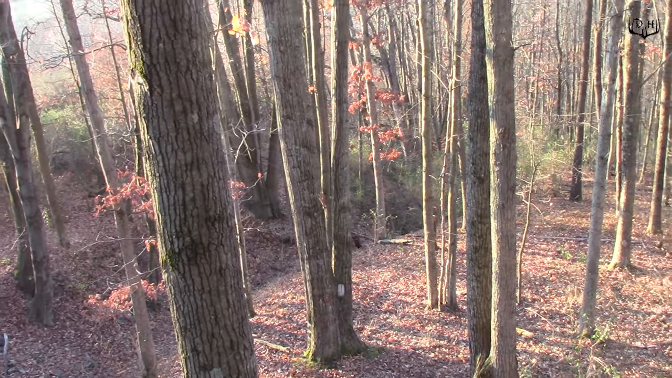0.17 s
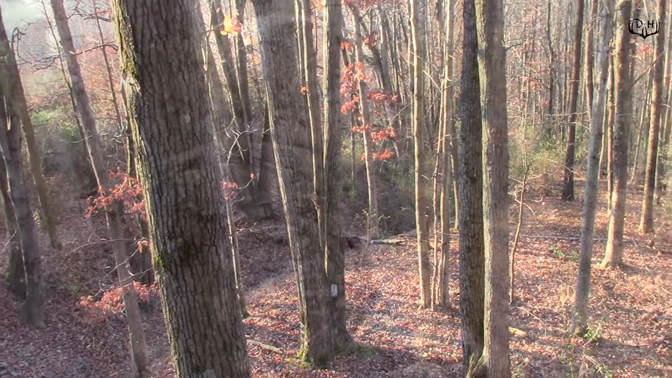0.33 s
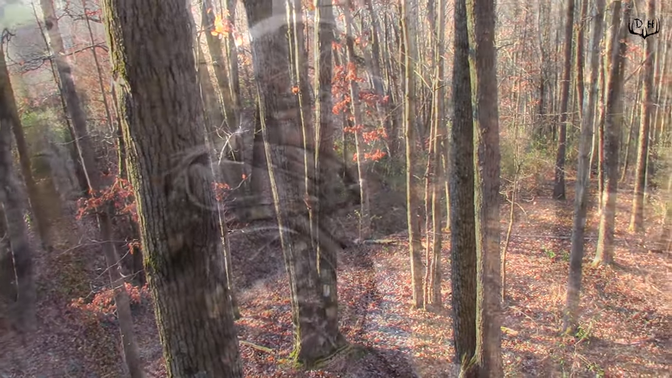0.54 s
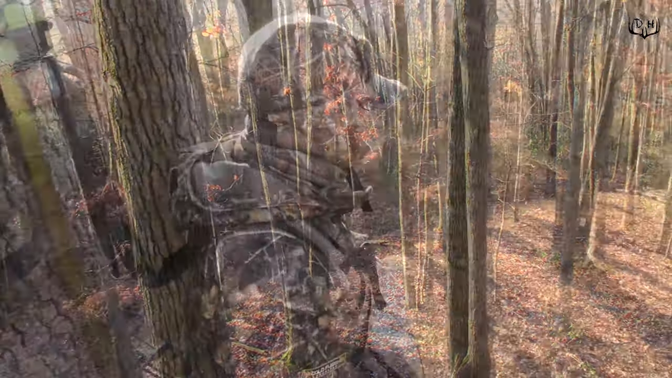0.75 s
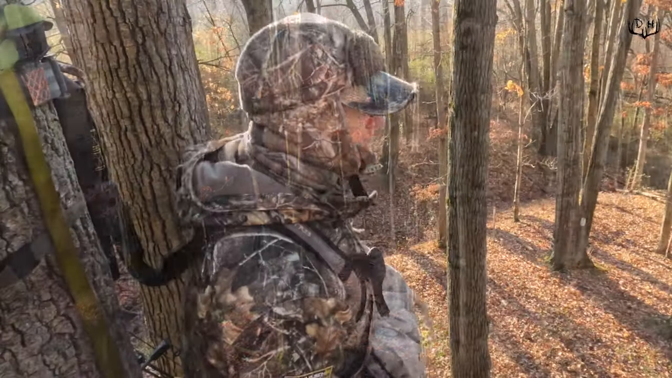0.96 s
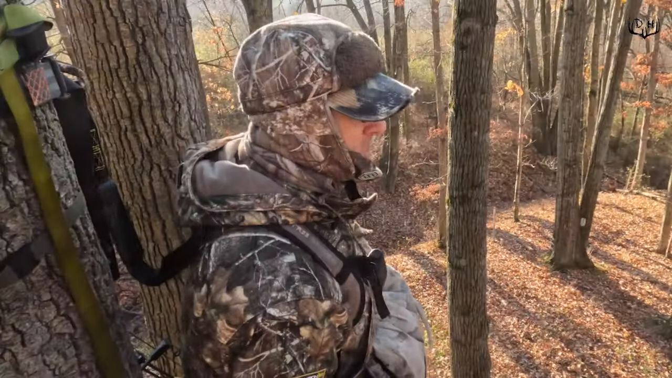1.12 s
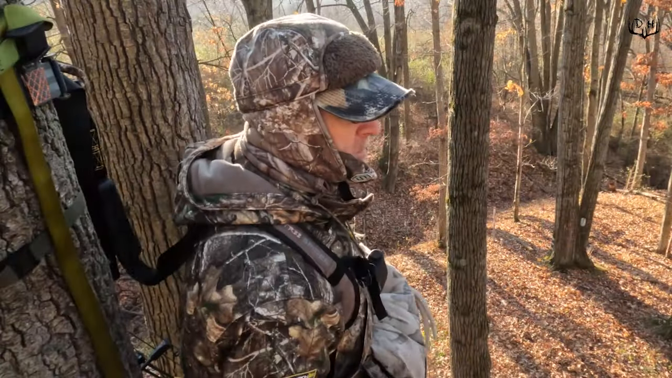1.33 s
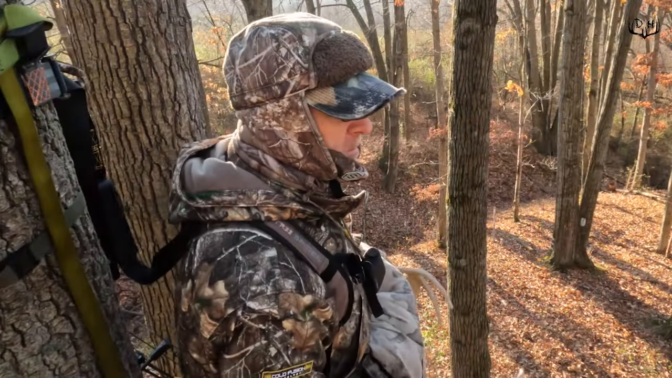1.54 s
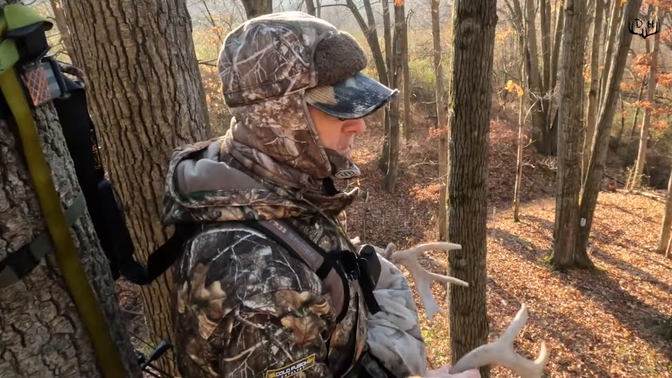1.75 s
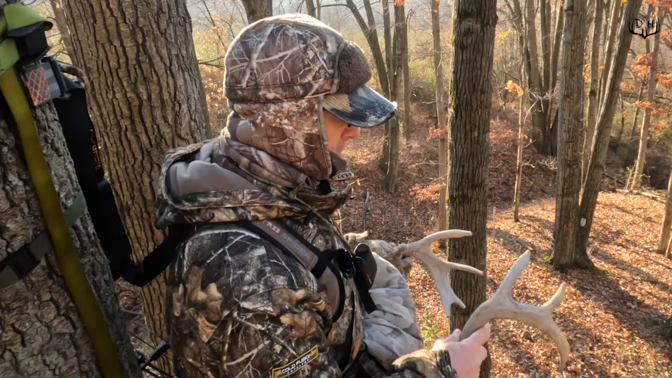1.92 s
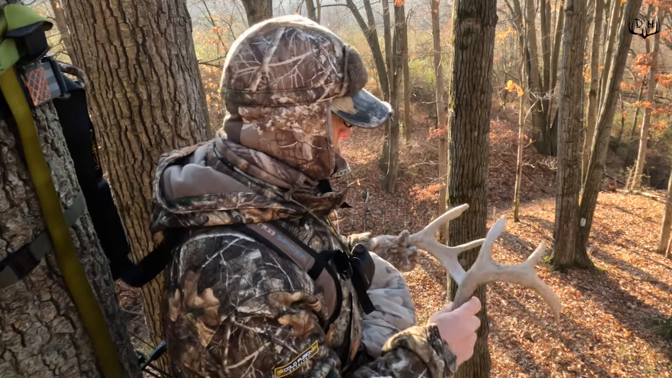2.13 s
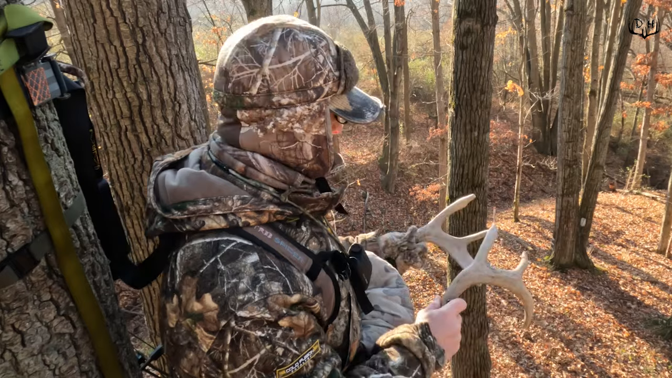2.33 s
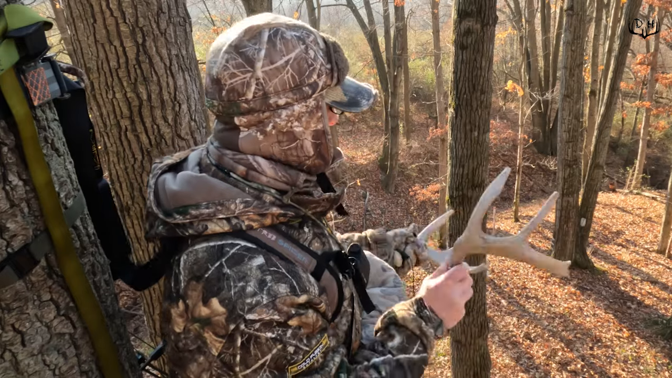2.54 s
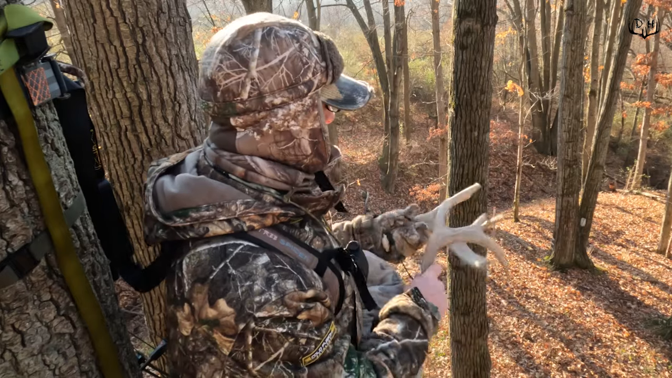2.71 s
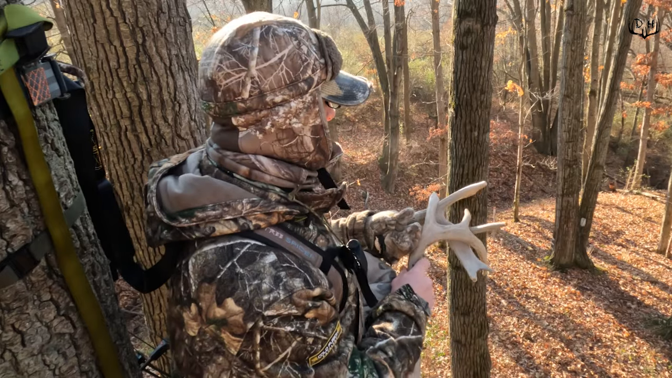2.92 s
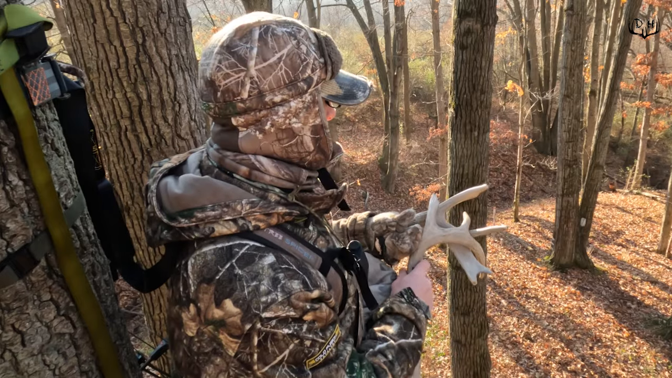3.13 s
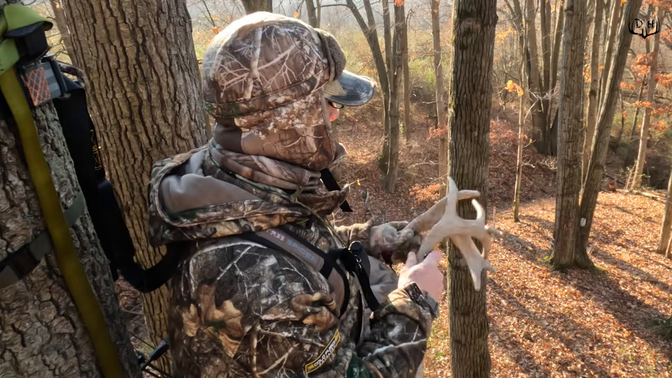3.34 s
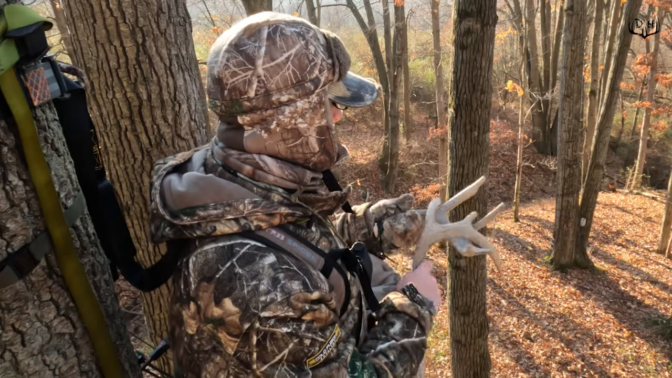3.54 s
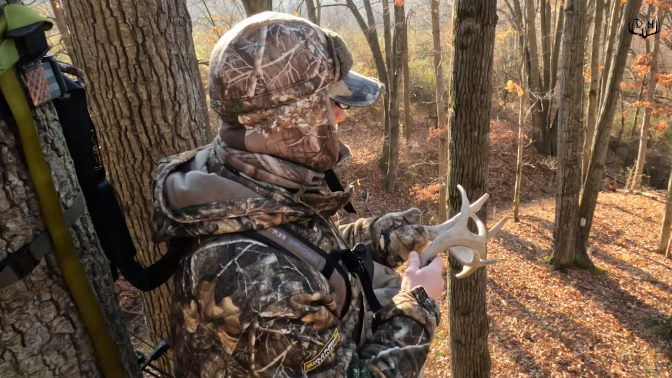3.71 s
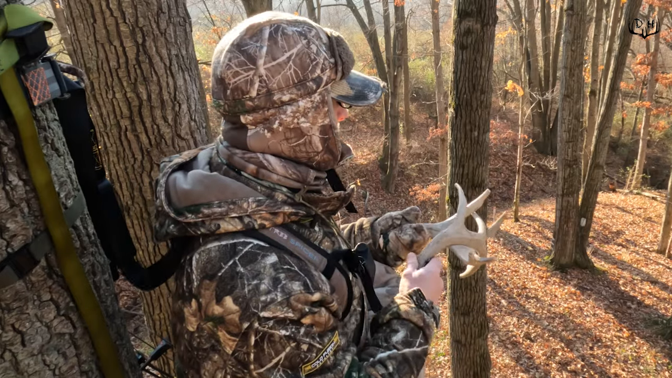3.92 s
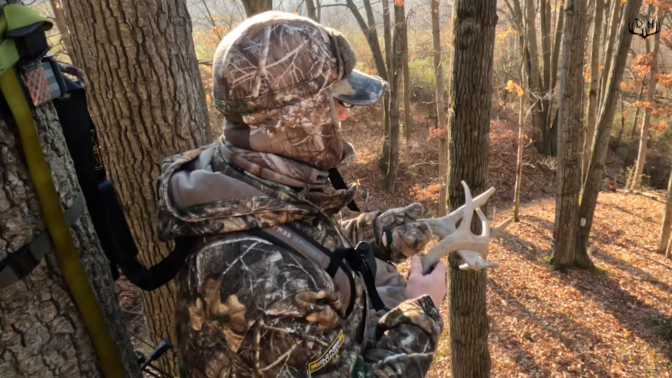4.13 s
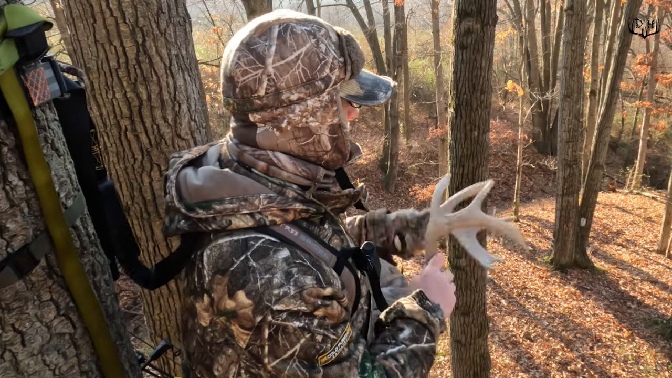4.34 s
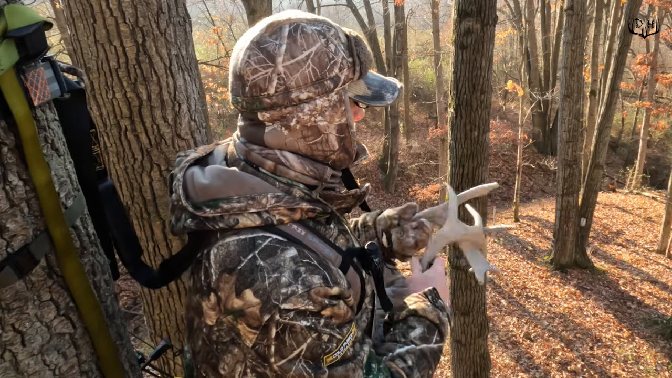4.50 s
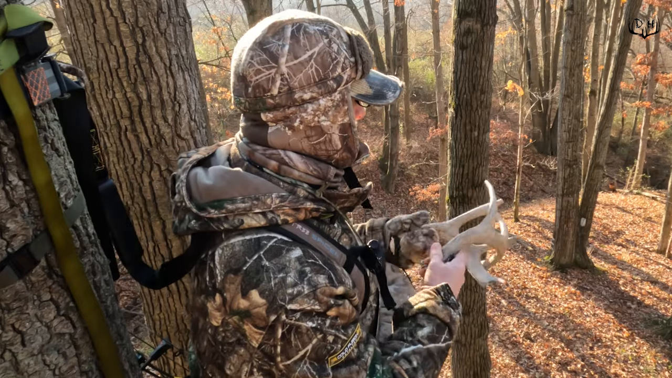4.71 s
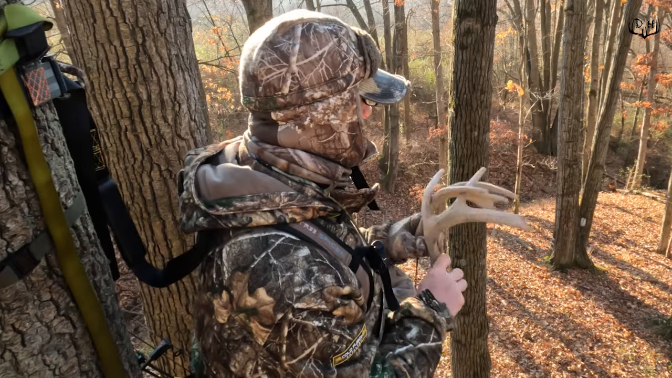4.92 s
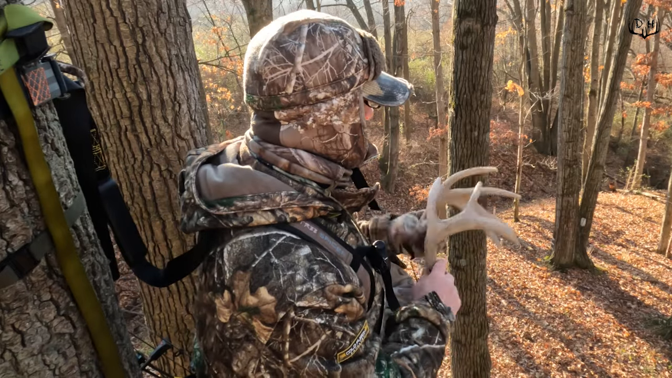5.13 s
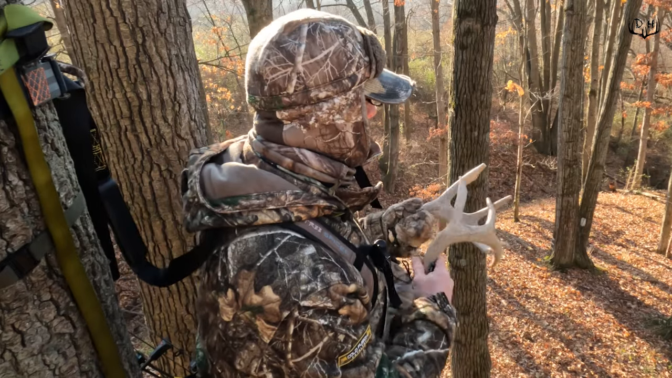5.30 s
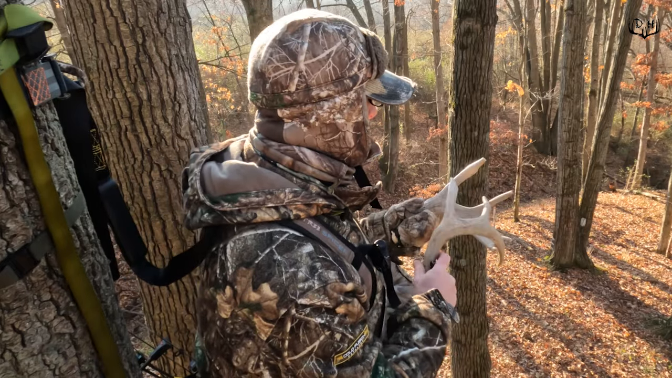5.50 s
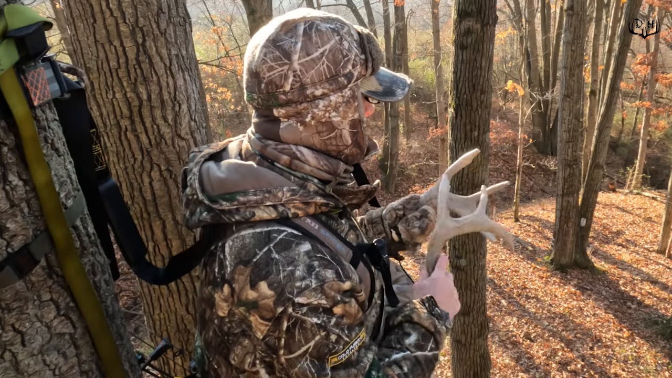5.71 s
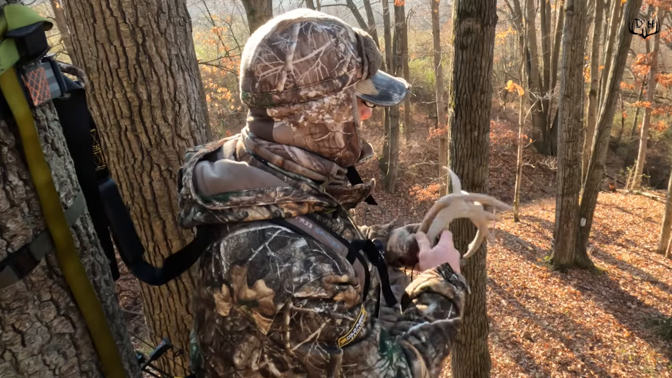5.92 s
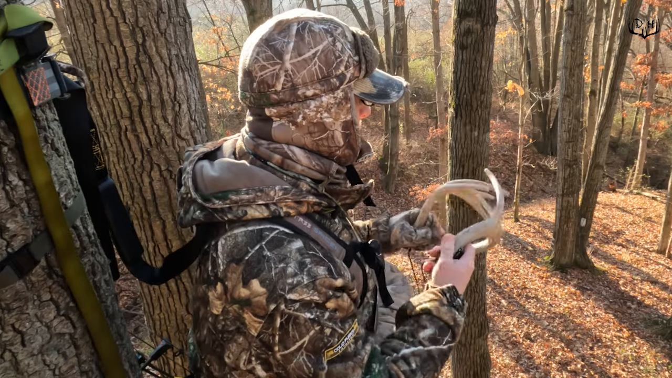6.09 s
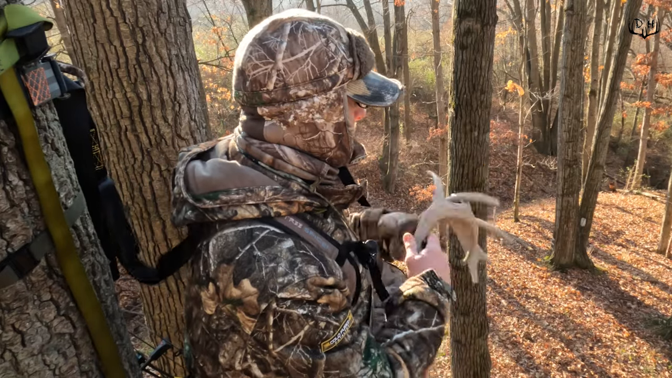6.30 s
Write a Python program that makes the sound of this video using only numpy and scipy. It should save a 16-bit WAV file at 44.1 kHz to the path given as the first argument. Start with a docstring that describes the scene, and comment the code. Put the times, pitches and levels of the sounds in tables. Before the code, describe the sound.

In quiet woods, a pair of antlers is rattled by hand close to the microphone. After a faint hum dies away, a few light taps come first, then a sudden hard clash and uneven bursts of clacking and brief grinding, bone on bone. Each hard hit leaves a soft, bright echo among the trees. Faint outdoor air and a low rumble of wind lie underneath.

```python
"""Antlers rattled in quiet woods

Two antlers are clashed and ground together by hand, close to a camera's stereo microphone.
Each clack rings the short modes of the bone; the trees send back a long soft tail.
A humming background fades out at the start, then woodland air fades in and wind presses softly
on the microphone. The camera's gain control ducks after the loud clashes."""
import sys
import numpy as np
from scipy import signal
from scipy.fft import rfft, irfft
from scipy.io import wavfile
from scipy.ndimage import uniform_filter1d, minimum_filter1d

SR = 44100
rng = np.random.default_rng(int(sys.argv[2]) if len(sys.argv) > 2 else 0)


def materialize(psi):
    """Save the field psi as 16-bit PCM at rate SR to the path in sys.argv[1].

    A 1-D psi becomes a single channel; in a 2-D psi each row is a channel.
    """
    bounded = np.clip(np.atleast_2d(psi).T, -1, 1)
    quanta = np.round(bounded * 32767).astype(np.int16)
    wavfile.write(sys.argv[1], SR, quanta)


N = 284621

# Blows of antler on antler, energy counted over 1 ms: start_s, level_db, tine_hz, treble_db
CLACKS = [(0.9688, -34, 2204, -20), (0.984, -47, 3550, -14), (1.011, -47.5, 2200, -26),
           (1.103, -32, 3990, -10.5), (1.1538, -47.5, 2120, -15), (1.2268, -24.5, 2280, -4),
          (1.2512, -34.5, 1480, 1), (1.282, -36.5, 2100, -13), (1.365, -41, 2210, -5),
          (1.611, -47, 3830, -7), (1.9215, -60, 3300, -20), (1.9839, -35, 2750, -7.5),
          (2.665, -49, 2780, -10), (2.8294, -1, 5700, 2), (2.834, 1, 6450, 0.5), (2.849, -12.5, 3570, -6),
          (2.8751, -8.5, 3120, -4), (2.8862, -19.5, 3540, -5), (2.894, -8.5, 2770, -12),
          (2.9058, -23, 2370, -9.5), (3.4076, -30, 1810, -26), (3.4533, -31.5, 3030, -12),
          (3.465, -23, 2630, -13), (3.5161, -21, 2390, -3), (3.6617, -8, 1628, 2), (3.6652, -1.5, 3160, -8),
          (3.6674, -16, 3500, -2), (3.69, -28.5, 1440, -13), (3.8148, -21.5, 3720, -8.5),
          (4.287, -7.5, 2510, 6), (4.3021, -12.5, 3200, -17), (4.3088, -8, 3710, -7),
          (4.397, -17.5, 2270, -13), (4.443, -13, 2900, 4), (4.4524, -14.5, 4200, 3),
          (4.5231, -4.5, 2600, -3), (4.5329, -8, 5170, 1), (4.546, -13.5, 2710, -5),
          (4.553, -17, 2620, -13), (4.5655, -11, 2370, -8), (4.582, -20.5, 906, -15),
          (4.6903, -19.5, 2630, -10), (4.7061, -27, 2410, -8), (4.853, -24, 3020, -14),
          (4.904, -6, 3690, -6.5), (4.915, -7, 5000, 12), (4.9296, -11.5, 3420, 4),
          (4.9419, -11.5, 3360, -4), (4.969, -17.5, 3280, 2), (4.992, -23, 5200, 3),
          (5.005, -26.5, 3140, -11.5), (5.0145, -22.5, 3060, -11), (5.0871, -18, 3430, 2),
          (5.22, -12.5, 3620, 2), (5.241, -18.5, 1410, 7.5), (5.2606, -2, 3500, 5), (5.27, -16, 3400, -17),
          (5.3, -13.5, 3300, -1), (5.3119, -19, 2660, -6.5), (5.317, -13, 3200, -6),
          (5.348, -24.5, 2040, -10), (5.4998, -31, 3200, -15), (5.6596, -35, 2570, -22),
          (5.683, -50, 2860, -21.5), (5.9764, -40.5, 2850, -7), (5.987, -11, 2920, 0),
          (6.008, -6.5, 3640, -7.5), (6.0142, -18.5, 3200, 1.5), (6.023, -17.5, 3500, -31),
          (6.0335, -17.5, 2930, -35), (6.051, -14.5, 3440, -17), (6.057, -12.5, 3200, -5.5),
          (6.103, -14.5, 2270, -12.5), (6.126, -20.5, 1450, -10), (6.149, -20.5, 2750, -3),
          (6.164, -25.5, 2660, -12.5), (6.2334, -17, 3610, -7.5), (6.3885, -11, 3900, -2),
          (6.394, -7, 3580, -15), (6.412, -16, 2640, 2), (6.4335, -21, 2200, -8)]
# Modes of the bone: pitch_hz, level_db
BONE_MODES = [(320, -20.5), (620, -14), (990, -4.5), (1400, -1.5), (1900, -1.5), (2260, 0), (2570, -2),
              (2950, -0.5), (3220, 0), (3500, -0.5), (3780, -1), (4400, -4.5), (5000, -3.5), (5500, -4),
              (5950, -9), (7050, -16)]
# Colour of the crack at contact: frequency_hz, level_db
CRACK_COLOUR = [(300, -22.5), (1500, -5), (4000, -1), (7600, 2.5), (10000, -4.5), (16000, -17.5)]
# Grinding strokes: start_s, length_s, from_db, to_db
STROKES = [(1.695, .03, -71, -68), (2.797, 0.033, -60, -27), (3.426, 0.065, -39, -32),
           (3.499, 0.024, -35, -38.5), (3.642, 0.018, -54.5, -30.5), (4.407, 0.026, -28.5, -33),
           (4.542, 0.056, -24, -44), (4.936, 0.12, -29, -42.5), (5.22, 0.088, -27.5, -68),
           (5.7, 0.076, -67, -59.5), (5.833, .022, -61, -63), (6.005, .06, -46, -23.5),
           (6.106, 0.063, -21.5, -48), (6.401, 0.039, -22.5, -32.5)]
# Jolts of the hardest clashes: start_s, level_db, pitch_hz
THUMPS = [(2.833, -16, 310), (3.665, -28, 427), (4.523, -32, 494), (5.26, -22.5, 453)]
# Microphone colour on clacks and grinding: frequency_hz, gain_db
MIC_COLOUR = [(20, 19), (7600, 0.5), (8200, -7.5), (11000, -7.5), (14000, -14.5), (16500, -23)]
# Balance of the antlers at the microphone: frequency_hz, left_minus_right_db
PORT_BALANCE = [(200, 0), (1300, -4.5), (4400, -2.5), (7000, -5.5), (9000, 1)]
# Phase between the microphone's two ports: frequency_hz, left_lead_rad
PORT_PHASE = [(60, 0.25), (1800, -0.37), (4650, -1.3), (6700, -0.82), (12000, 1)]
# Decay of the echo from the far trees: frequency_hz, t60_s
TREE_DECAY = [(300, 0.17), (1300, 1.08), (3000, 1.58), (5000, 1.0), (7500, 0.79), (15000, 0.082)]
# Level of the low wind rumble: time_s, level_db
WIND_LEVEL = [(0.68, -90), (0.97, -53), (2.14, -42.5), (2.77, -44), (2.94, -49.5), (6.45, -52.5)]
# Colour of that rumble: frequency_hz, level_db
WIND_COLOUR = [(20, -7), (50, -25.5), (20000, -150)]
# Colour of the woodland air: frequency_hz, level_db
WOODS_COLOUR = [(24, -26.5), (40, -0.5), (83, -5), (187, -5), (431, -15), (739, -15.5), (1300, -23),
                (2340, -53.5), (5000, -46.5), (7590, -51.5), (12500, -68)]
# Colour of the humming air at the start: frequency_hz, level_db
HUM_COLOUR = [(20, -30), (75, 3.5), (110, -22), (148, 2.5), (400, -17.5), (1100, -20.5), (2300, -48),
              (5200, -44.5), (11000, -64)]
# Likeness of left and right in air and wind: frequency_hz, correlation
AIR_LIKENESS = [(60, 1), (950, 0.82), (3770, 0.88)]

GRIPPED_S, LOOSE_RING = 2.75, 1.3  # held loosely until then, the bone rings longer and ticks crisper


def clacks(spread=0.15, reach_db=8, scatter_db=3, thin_db=6, grip=0.025,
           blur_s=0.0014, chatter_s=0.0041, crack_s=0.0017, top_hz=8500):
    """Each blow is a chatter of contacts that rings the bone. Rows: to the microphone, to the trees."""
    out, crack, hz = np.zeros((2, N)), impulse(CRACK_COLOUR), np.transpose(BONE_MODES)[0]
    t = np.arange(400) / SR
    draws = rng.standard_normal((len(CLACKS), 2 * len(hz) + 2 * len(t)))
    for (start_s, level_db, tine_hz, treble_db), row in zip(CLACKS, draws):
        scatter, shift, contacts, grit = np.split(row, [len(hz), 2 * len(hz), -len(t)])
        apart = np.log(hz / tine_hz)
        nearest = abs(apart).argmin()
        stretch = np.exp(grip * shift)  # the grip shifts each mode a little
        stretch[nearest] = tine_hz / hz[nearest]
        loose = LOOSE_RING if start_s < GRIPPED_S else 1
        modes = bone_rings(stretch, loose)
        # Modes near the struck tine ring most, those far below it less; soft blows miss the high ones.
        mode_db = reach_db * np.exp(-(apart / spread) ** 2) + thin_db * np.minimum(apart, 0)
        mode_db += scatter_db * scatter + .5 * (treble_db + 12) * np.clip(np.log2(hz / 3000), 0, 1)
        ring = (np.sign(shift) * gain_of(mode_db)) @ modes
        chatter = 0.27 * contacts * (abs(contacts) > 2) * np.exp(-t / chatter_s)
        chatter[0] = 1
        facing = signal.fftconvolve(chatter, ring)[:len(ring)]
        # The trees get a shorter ring with the modes more even.
        spreading = ((-1.) ** np.arange(len(hz)) * gain_of(.12 * mode_db)) @ modes
        spreading *= np.exp(-np.arange(len(ring)) / SR / blur_s)
        sounds = np.array([facing, spreading])
        sounds /= np.linalg.norm(sounds, axis=1, keepdims=True)
        # The crack is strongest near the tine's pitch, and duller on soft blows.
        snap = signal.fftconvolve(grit * np.exp(-t / crack_s), crack)
        snap += 0.97 * signal.lfilter(*signal.iirpeak(tine_hz, 1.6, SR), snap)
        cutoff_hz = min(loose ** 2 * top_hz * gain_of(.5 * treble_db), SR / 2.2)
        snap = signal.lfilter(*signal.butter(1, cutoff_hz, fs=SR), snap)
        sounds[0, :len(snap)] += gain_of(treble_db) * snap / np.linalg.norm(snap)
        sounds[1, :len(crack)] += gain_of(.5 * treble_db - 7.5) * crack / np.linalg.norm(crack)
        gain = gain_of(level_db) * np.sqrt(SR / 1000) / np.hypot(1, gain_of(treble_db))
        for path, sound in zip(out, sounds):
            add(path, start_s, gain * sound)
    return out


def bone_rings(stretch, longer=1, ring_s=0.019):
    """Struck bone rings as damped sines, one row a mode; higher modes die sooner."""
    hz, db = np.transpose(BONE_MODES)[:, :, None]
    t = np.arange(1800) / SR
    t60 = longer * ring_s * np.sqrt(1000 / hz)
    attack = 1 - np.exp(-t / .00022)
    return attack * gain_of(db - 60 * t / t60) * np.sin(2 * np.pi * hz * stretch[:, None] * t)


def grinds(slips_per_s=1300, uneven_db=4.2, centre_hz=3200, reach_db=5, grit_db=-12):
    """Rough bone drags over bone: uneven slips, each with its own mix of modes and a gritty crack."""
    out, hz = np.zeros(N), np.transpose(BONE_MODES)[0]
    middle_db = reach_db * np.exp(-(np.log(hz / centre_hz) / 0.23) ** 2)
    modes = bone_rings(np.ones(len(hz))) * gain_of(middle_db)[:, None]
    crack = impulse(CRACK_COLOUR)
    mode_size = np.linalg.norm(modes) / np.sqrt(len(hz))
    modes[:, :len(crack)] += gain_of(grit_db) * mode_size * crack / np.linalg.norm(crack)
    for start_s, length_s, from_db, to_db in STROKES:
        t = np.arange(0, length_s, 1 / SR)
        force, chance = rng.random((2, SR // 5))[:, :len(t)]
        slips = gain_of(uneven_db * np.minimum(-np.log(1 - force), 4)) * (chance < slips_per_s / SR)
        kicks = rng.standard_normal((len(hz), SR // 5))[:, :len(t)] * slips
        ramp = gain_of(from_db + (to_db - from_db) * t / length_s)
        sound = signal.fftconvolve(kicks * ramp, modes, axes=1).sum(0)
        add(out, start_s, sound / np.sqrt(np.mean(kicks ** 2) * np.sum(modes ** 2) + 1e-20))
    return out


def thumps(t60_s=.05):
    """Hard clashes jolt the hands and the thick beam: short low rings with a soft start."""
    start_s, level_db, hz = np.transpose(THUMPS)[:, :, None]
    age = np.maximum(np.arange(N) / SR - start_s, 0)
    envelope = gain_of(level_db - 60 * age / t60_s) * (1 - np.exp(-age / .002))
    return (envelope * np.sin(2 * np.pi * hz * age)).sum(0)


def mic_ports(x):
    """The two microphone ports hear the close antlers, each with its own level and phase."""
    hz = np.fft.rfftfreq(N, 1 / SR)
    half = gain_of(curve_at(PORT_BALANCE, hz) / 2) * np.exp(.5j * curve_at(PORT_PHASE, hz))
    return irfft(rfft(x) * np.array([half, 1 / half]), N)


def tree_echoes(x, near_db=-24, near_s=0.036, far_db=-24, sheen_db_per_octave=4):
    """A quick cluster of echoes from the nearest trunks, then a bright tail that dies band by band."""
    taps = np.zeros((2, SR))
    arrivals = np.arange(100, SR - 20, 20) + rng.integers(0, 20, (2, (SR - 101) // 20))
    np.put_along_axis(taps, arrivals, rng.choice([-1., 1.], arrivals.shape), 1)
    hz, t, spectra = signal.stft(taps, SR, nperseg=256)
    rise = 1 - np.exp(-(t / 0.0078) ** 2)  # the long tail swells in over a few milliseconds
    sheen_db = sheen_db_per_octave * np.log2(1 + hz[:, None] / 1000)
    decay_db = 60 * t / curve_at(TREE_DECAY, hz)[:, None]
    far = signal.istft(spectra * rise * gain_of(sheen_db - decay_db), SR, nperseg=256)[1][:, :SR]
    near = taps * np.exp(-np.arange(SR) / SR / near_s)
    tail = gain_of(far_db) * far / np.linalg.norm(far[0])
    tail += gain_of(near_db) * near / np.linalg.norm(near[0])
    tail = tail + .5 * tail[::-1]  # each side also hears the other's echoes
    return signal.fftconvolve(x[None], tail, axes=1)[:, :N]


def wind(t):
    """Low rumble of wind on the microphone; its level fades in, swells, drops at the first loud clash."""
    return gain_of(np.interp(t, *np.transpose(WIND_LEVEL))) * air(WIND_COLOUR)


def air(colour, patchy_db=2.0):
    """Air all around the microphone: coloured stereo noise with drifting patches, rms 1."""
    frames, hz = N // 512 + 5, np.fft.rfftfreq(2048, 1 / SR)
    left_re, left_im, side_re, side_im, patches = rng.standard_normal((frames, 1025, 5)).T
    patches = unit_rms(uniform_filter1d(uniform_filter1d(patches, size=12, axis=0), size=10, axis=1))
    likeness = np.clip(curve_at(AIR_LIKENESS, hz), -1, 1)[:, None]
    left = left_re + 1j * left_im
    right = likeness * left + np.sqrt(1 - likeness ** 2) * (side_re + 1j * side_im)
    right *= np.exp(-.7j * curve_at(PORT_PHASE, hz))[:, None]
    spectra = np.array([left, right]) * gain_of(curve_at(colour, hz)[:, None] + patchy_db * patches)
    return unit_rms(signal.istft(spectra, nperseg=2048, noverlap=1536)[1][:, :N])


def gain_of(db):
    """Decibels to amplitude."""
    return 10 ** (np.asarray(db) / 20)


def unit_rms(x):
    """Scales to rms 1."""
    return x / np.sqrt(np.mean(x ** 2) + 1e-20)


def curve_at(points, hz):
    """Reads a table on a log-frequency axis."""
    table_hz, value = np.transpose(points)
    return np.interp(np.log(hz + 1), np.log(table_hz + 1), value)


def impulse(colour):
    """Minimum-phase impulse with the given colour."""
    hz = abs(np.fft.fftfreq(4096, 1 / SR))
    log_gain = np.log(gain_of(curve_at(colour, hz)))
    return np.fft.ifft(np.exp(log_gain - 1j * signal.hilbert(log_gain).imag)).real[:256]


def add(mix, start_s, sound):
    """Mixes a sound in at start_s."""
    part = mix[round(start_s * SR):][:len(sound)]
    part += sound[:len(part)]


def scene(hum_db=-48, woods_db=-43, silent_s=0.69, fade_in_s=0.77):
    """Antlers up close, trees around, air behind; the fader touches zero at silent_s and opens again."""
    t = np.arange(N) / SR
    facing, spreading = signal.oaconvolve(clacks() + grinds(), impulse(MIC_COLOUR)[None], axes=1)[:, :N]
    fade_out = np.clip(1 - t / silent_s, 0, 1) ** 1.04
    fade_in = np.clip((t - silent_s) / fade_in_s, 0, 1)
    rumble = wind(t) * (t > silent_s)
    hum = fade_out * gain_of(hum_db) * air(HUM_COLOUR)
    woods = fade_in * gain_of(woods_db) * air(WOODS_COLOUR)
    turn = 2 * np.pi * 1.9 * t  # the hands keep moving, so the echoes keep changing
    echoes = tree_echoes(np.cos(turn) * spreading) + tree_echoes(np.sin(turn) * spreading)
    return mic_ports(facing + thumps()) + echoes + hum + woods + rumble


def record(dry, knee_db=-32, duck_share=0.26, release_db_per_s=6, top_hz=16600):
    """The camera's gain control ducks on loud clashes and recovers slowly; then limiter and low-pass."""
    power = uniform_filter1d((dry ** 2).mean(0), size=880, origin=439)
    power_db = 10 * np.log10(abs(power) + 1e-12)
    fall_db = np.arange(N) * release_db_per_s / SR
    held_db = np.maximum.accumulate(power_db + fall_db) - fall_db
    over_db = np.maximum(held_db - knee_db, 0)
    ducked = dry / gain_of(duck_share * uniform_filter1d(over_db, size=1760, origin=879))
    safe_gain = np.minimum(.99 / (abs(ducked).max(0) + 1e-9), 1)
    limited = ducked * uniform_filter1d(minimum_filter1d(safe_gain, size=61), size=31)
    low_pass = signal.firwin(511, top_hz, window=("kaiser", 9), fs=SR)
    return signal.oaconvolve(limited, low_pass[None], "same")


dry = scene()
out = record(dry)
materialize(out)
```